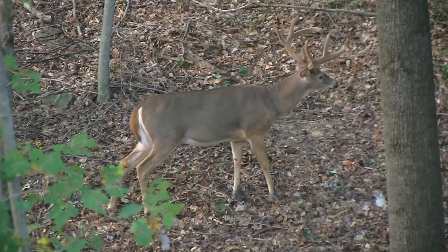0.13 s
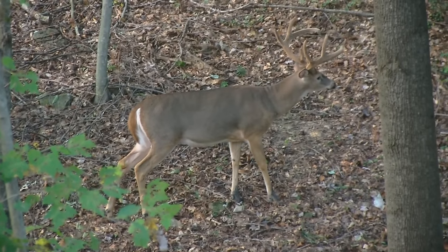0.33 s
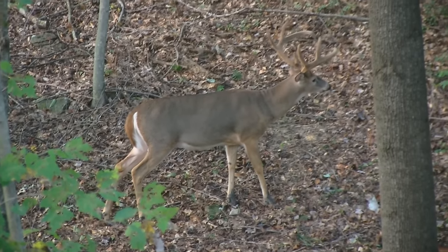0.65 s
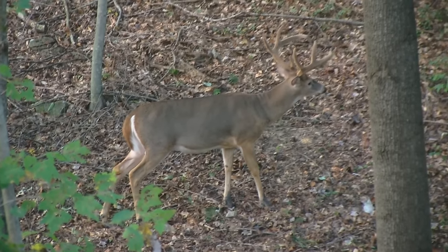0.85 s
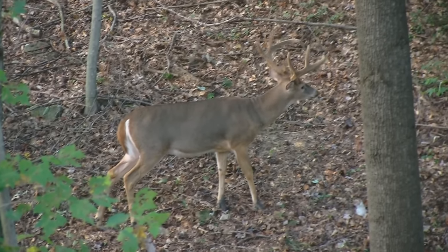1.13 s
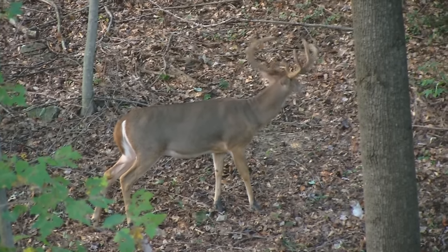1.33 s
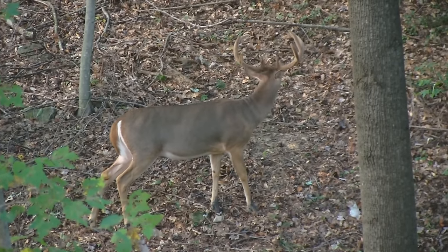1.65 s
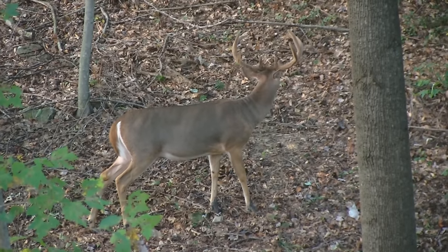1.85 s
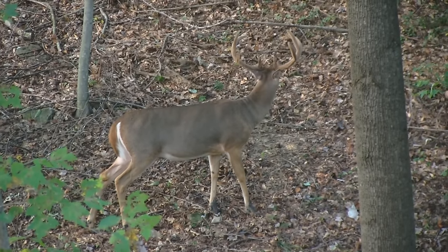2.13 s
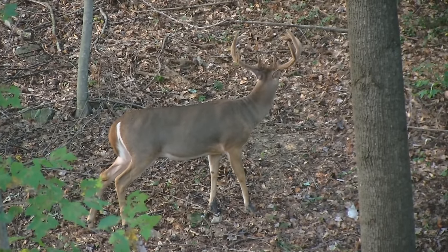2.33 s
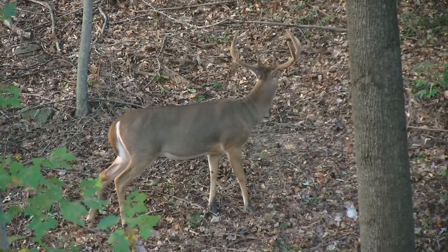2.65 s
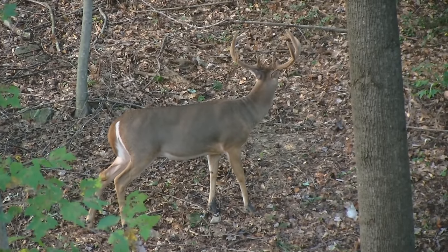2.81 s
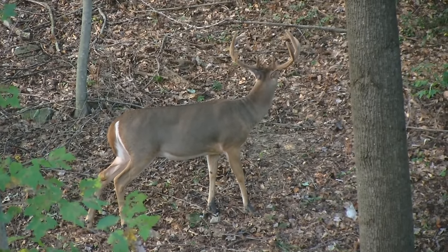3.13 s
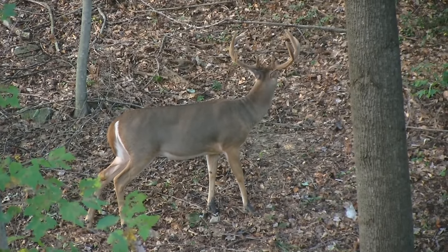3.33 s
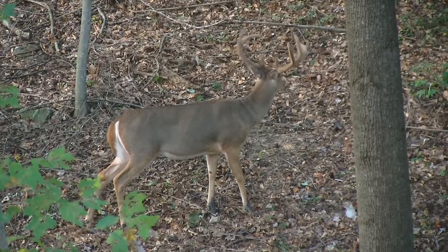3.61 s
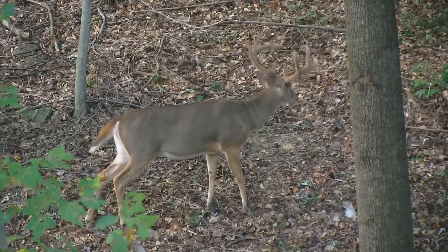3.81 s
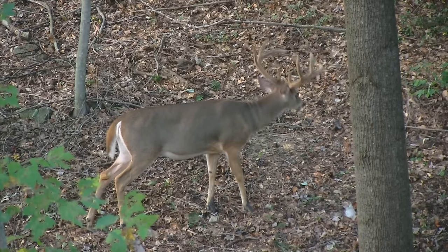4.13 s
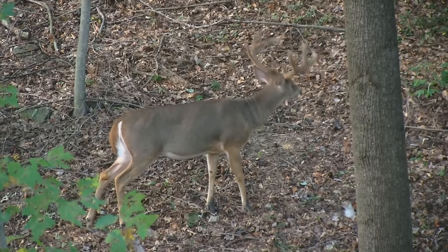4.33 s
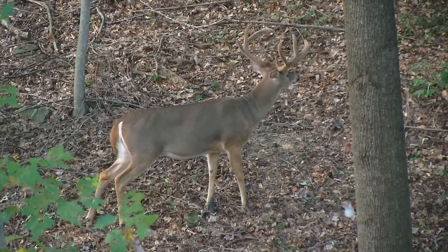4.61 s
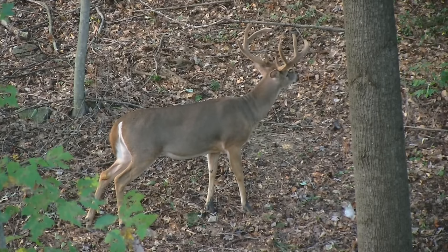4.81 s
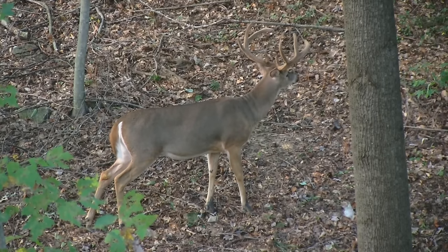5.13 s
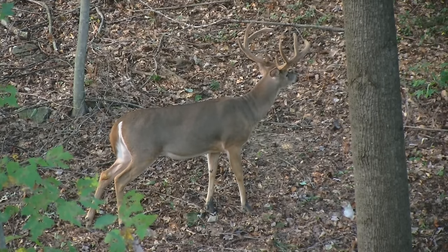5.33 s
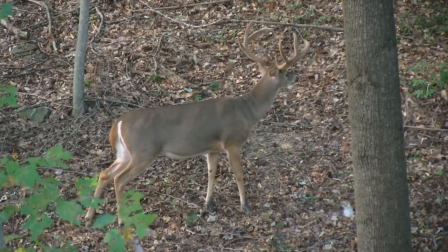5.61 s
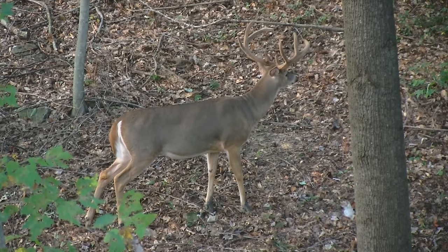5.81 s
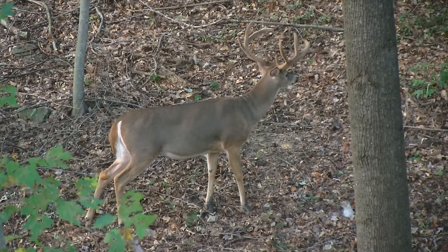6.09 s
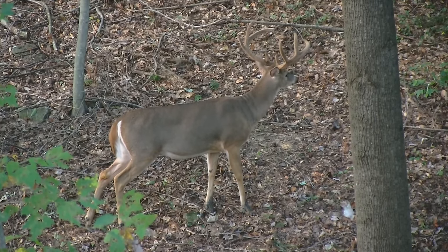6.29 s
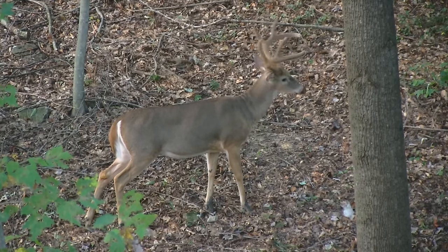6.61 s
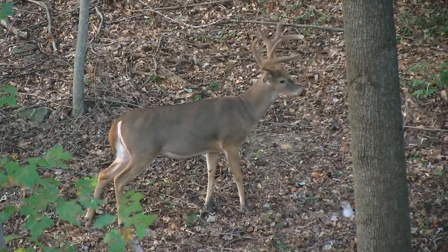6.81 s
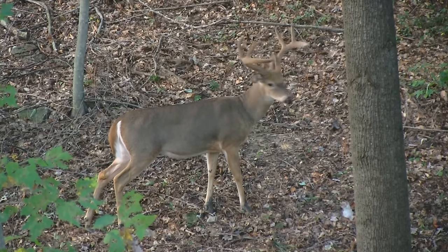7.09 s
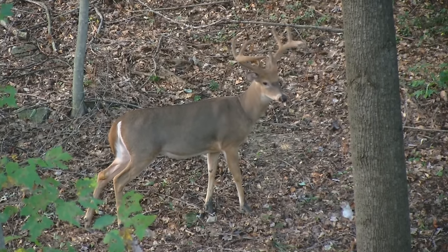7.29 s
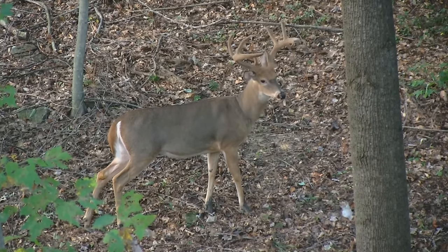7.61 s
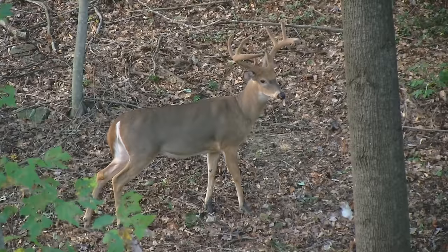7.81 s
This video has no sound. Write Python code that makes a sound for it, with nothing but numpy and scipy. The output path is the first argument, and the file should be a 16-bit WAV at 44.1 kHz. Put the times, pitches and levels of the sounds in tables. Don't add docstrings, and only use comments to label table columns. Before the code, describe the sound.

Loud rasping cicada song on the left sags and stops over distant pulsing insects, low wind rumble, and later small dry twig ticks.

```python
import sys
import numpy as np
from scipy import signal
from scipy.fft import rfft, irfft, next_fast_len
from scipy.io import wavfile
from scipy.ndimage import uniform_filter1d, map_coordinates

SR = 44100
rng = np.random.default_rng(int(sys.argv[2]) if len(sys.argv) > 2 else 0)


def voltage_ratio(level):
    return 10 ** (np.asarray(level, float) / 20)


def int16_out(signal):
    q = np.round(np.clip(np.atleast_2d(signal).T, -1, 1) * 32767)
    wavfile.write(sys.argv[1], SR, q.astype(np.int16))


N = 350595
TIME = np.arange(N) / SR

# [t/s, click rate/Hz]
TYMBAL_RATE = [(0, 334), (2.4, 355), (2.7, 215), (4.6, 235)]
# [f/Hz, level/dB per Hz]
FULL_BELLY = [(1300, -64), (2200, -29.5), (3600, -12), (3880, -4.5), (4490, -4.5), (5150, -0.5), (5600, -4),
              (5950, 1.5), (6500, 1), (7400, -7), (9000, -12.5), (9700, -16), (10500, -30.5), (14000, -42)]
# [f/Hz, level/dB per Hz]
SLACK_BELLY = [(1300, -58), (2200, -28.5), (3500, -11.5), (4100, -7), (4950, -2), (5500, -2), (6050, 0),
               (6500, -3), (7400, -10), (9000, -14), (9700, -15.5), (10500, -27), (14000, -47)]
# edge f/Hz, usual level/dB under the body
UPPER_BAND = (7670, 11.3)
# [beat number, gain/dB]
FLARES = [(3, 2.5), (7, 2), (10, 1.5), (12, 1.5), (15, 1.5), (20, 3), (22, 3.5), (23, 2), (24, 2)]
# [t/s, fall/dB, regained/dB]
DROPS = [
    (2.51, 2.6, 1.2),
    (2.76, 2.8, .9),
    (3.2, 2.2, 1.5),
    (3.45, 2.5, 2.5),
    (3.7, 5.5, 3.2),
    (4.04, 6, 4.5),
    (4.28, 7, 0),
    (4.45, 4, -2.5),
]
# [f/Hz, level/dB per Hz]
LOW_SINGERS = [(1800, -52), (3000, -18.5), (3730, -15.5), (4150, -8), (4450, -2), (4950, -0.5),
               (5200, -5.5), (5800, -12.5), (7500, -36), (12800, -120)]
# [f/Hz, level/dB per Hz]
HIGH_SINGERS = [(3200, -46), (5500, -13.5), (6000, -7.5), (6350, -6), (6700, -1), (7000, -5.5), (7450, -5),
                (8100, -10.5), (8550, -15.5), (9600, -15.5), (9900, -22), (10400, -26.5), (14000, -72)]
# [f/Hz, level/dB per Hz]
RUMBLE = [(3, -34), (8, -12), (14, -4), (20, 1.5), (28, -4), (40, -14), (50, -20.5), (62, -30), (80, -38),
          (120, -64)]
# [t/s, level/dB]
BREEZE = [(0, -45), (.5, -46), (1.2, -44), (1.65, -55), (2.3, -54), (4, -56), (5.5, -52), (6.3, -55),
          (7.4, -61), (7.95, -57)]
# [t/s, gain/dB, half length/s]
GUSTS = [(.19, 6, .08), (.64, 6, .05), (.9, 12, .045), (1.08, 11, .04), (1.49, 6, .03), (2.04, 10, .04),
         (2.63, -7, .06), (2.9, 4, .07), (4.01, -9, .04), (4.16, 5, .05), (5.2, -8, .03), (5.31, 9, .04),
         (5.76, 7, .04), (6.12, -9, .04), (6.64, 4, .05), (6.95, 9, .05), (7.24, -7, .03), (7.52, 9, .04),
         (7.87, 7, .06)]
# [f/Hz, level/dB per Hz]
WOODS = [(29, -31), (50, 14.5), (64, -6), (81, -4.5), (172, -5.5), (231, -8.5), (390, -10), (562, -13),
         (623, -13.5), (742, -12.5), (1570, -17.5), (3200, -20), (4160, -48.5), (7040, -120)]
# [t/s, gain/dB, half length/s]
STIRS = [
    (0, 3.5, .15),
    (.6, 1, .2),
    (3.7, 1, .15),
    (5.55, 2.8, .12),
]
# [f/Hz, width/Hz, level/dB]
HUM = [(91, 14, -72), (181.4, 6.9, -82), (245.8, 6.6, -77.5), (335.4, 6, -79)]
# [t/s, length/s, start f/Hz, end f/Hz, level/dB, lower octave level/dB]
PEEPS = [
    (3.214, 0.053, 1740, 1920, -66.5, -4),
    (7.204, 0.047, 1690, 2040, -63, -7),
    (7.425, .12, 2000, 1910, -69, -20),
]
# [t/s, peak level/dB, ring 0-1]
TICKS = [
    (5.895, -41, .9),
    (5.905, -58, .5),
    (6.106, -55, 0.6),
    (6.639, -64, 0.3),
]
# [f/Hz, level/dB]
CRACK = [(300, -53), (700, -15), (1100, -1), (2600, 3), (3800, 0), (4600, -20), (8000, -50)]
# [f/Hz, level/dB, t60/s]
TWIG_MODES = [(1150, -1, 0.03), (2450, 2, .02), (3100, -3, 0.012)]
# [f/Hz, level/dB per Hz]
HISS = [(20, -3), (1000, -0.5), (2000, -2), (14000, -1.5), (16000, -6.5)]

SONG_DB, TIRING_DB_PER_S = -43.7, .35
FALL_S, REGAIN_S = .012, .09
UPPER_FALL_DB, UPPER_SAG_DB_PER_S, UPPER_LAST_DB = 3, 5.5, -68
FLUTTER_HZ, FLUTTER_DB, FLUTTER_S = 9.69, .7, .005
FLARE_S, FLARE_BODY = .016, .35
LOW_DB, HIGH_DB = -62.4, -63
WASH_DB = -72.6
RING_LAG_S = .0002


def unit(x):
    return x / np.sqrt(np.mean(x ** 2) + 1e-20)


def noise():
    return rng.standard_normal(N)


def curves(rows):
    s, *columns = np.transpose(rows)
    return [np.interp(TIME, s, column) for column in columns]


def wobble(rate):
    knots = rng.standard_normal(int(N * rate / SR) + 4)
    return map_coordinates(knots, [np.arange(N) * rate / SR])


def bumps(rows):
    return sum(db * np.exp(-.5 * ((TIME - s) / width) ** 2) for s, db, width in rows)


def coloured(x, points):
    m = next_fast_len(N + 8192)
    f, db = np.transpose(points)
    bins = np.fft.rfftfreq(m, 1 / SR)
    gain = voltage_ratio(np.interp(np.log(bins + 1), np.log(f + 1), db))
    cepstrum = irfft(np.log(gain + 1e-6), m)
    cepstrum[1:m // 2] *= 2
    cepstrum[m // 2 + 1:] = 0
    return unit(irfft(rfft(x, m) * np.exp(rfft(cepstrum)), m)[:N])


def trees(x, t60, wet):
    t = np.arange(SR // 4) / SR
    tail = voltage_ratio(-60 * t / t60) * rng.standard_normal(len(t))
    tail = wet * tail / np.linalg.norm(tail)
    tail[0] = 1
    return unit(signal.fftconvolve(x, tail)[:N])


def clicks(rate, jitter, scatter_db):
    turns = np.cumsum(rate * (1 + jitter * wobble(40))) / SR
    ticks = np.diff(np.floor(turns), prepend=0)
    return unit(ticks * voltage_ratio(scatter_db * noise()) * np.sign(noise()))


def effort():
    def step(s):
        return .5 + .5 * np.tanh((TIME - s) / FALL_S)

    first = DROPS[0][0]
    fallen = step(first)
    flare_db = bumps([(FLUTTER_S + beat / FLUTTER_HZ, db, FLARE_S) for beat, db in FLARES])
    flutter = np.cos(2 * np.pi * FLUTTER_HZ * (TIME - FLUTTER_S))
    flare_db = flare_db + (1 - fallen) * FLUTTER_DB * flutter
    lost_db = 0
    for s, fall, back in DROPS:
        regained = 1 - np.exp(-np.clip(TIME - s, 0, None) / REGAIN_S)
        lost_db = lost_db + step(s) * (fall - back * regained)
    sag_db = fallen * (UPPER_FALL_DB + UPPER_SAG_DB_PER_S * (TIME - first))
    upper_db = SONG_DB - UPPER_BAND[1] + flare_db - sag_db
    body_db = SONG_DB - TIRING_DB_PER_S * np.minimum(TIME, first) + FLARE_BODY * flare_db - lost_db
    return body_db, np.maximum(upper_db, UPPER_LAST_DB)


def cicada():
    rate, = curves(TYMBAL_RATE)
    body_db, upper_db = effort()
    pump_db = .5 * np.cos(2 * np.pi * 7.78 * (TIME - 2) + .6) + .35 * wobble(16)
    drive = .46 * clicks(rate, jitter=.02, scatter_db=2.2)
    drive = drive + .36 * clicks(.8 * rate, jitter=.02, scatter_db=2.2) + noise()
    slack = np.clip((TIME - 2.45) / .15, 0, 1)
    body = (1 - slack) * coloured(drive, FULL_BELLY) + slack * coloured(drive, SLACK_BELLY)
    body = trees(body, t60=.15, wet=.38)
    edge_hz, usual_db = UPPER_BAND
    upper = signal.sosfiltfilt(signal.butter(6, edge_hz, "high", fs=SR, output="sos"), body)
    upper_gain = voltage_ratio(upper_db - body_db + usual_db + 0.75 * pump_db)
    rest = np.clip((5.5 - TIME) / 0.16, 0, 1)
    return rest * voltage_ratio(body_db + 6.5 + pump_db) * (body + (upper_gain - 1) * upper)


def chorus():
    unison = np.clip((TIME - 4.4) / 1.6, .35, 1)
    throb_db = 1.9 * unison * np.cos(2 * np.pi * 9.27 * (TIME - 6) - 1.15)
    low_drive = .45 * clicks(np.full(N, 282.), jitter=0.043, scatter_db=2) + noise()
    high_drive = 0.28 * clicks(np.full(N, 130.), jitter=0.036, scatter_db=2) + noise()
    low = trees(coloured(low_drive, LOW_SINGERS), t60=.15, wet=.3)
    high = trees(coloured(high_drive, HIGH_SINGERS), t60=.15, wet=.3)
    low = voltage_ratio(LOW_DB + 10.5 + throb_db + .25 * wobble(4)) * low
    high = voltage_ratio(HIGH_DB + 11 + 0.24 * throb_db + 0.23 * wobble(7)) * high
    return low + high


def wind():
    eddies = coloured(noise(), RUMBLE)
    power = uniform_filter1d(uniform_filter1d(eddies ** 2, size=3000), size=3000)
    size = np.sqrt(np.abs(power))
    breeze_db, = curves(BREEZE)
    return voltage_ratio(breeze_db + bumps(GUSTS) + 7.5) * eddies / (size + 0.16)


def air():
    hum = np.zeros(N)
    for hz, width, db in HUM:
        hum += voltage_ratio(db + 1.5 * wobble(3)) * np.sin(2 * np.pi * hz * TIME + .8 * wobble(width))
    wash_db = WASH_DB + bumps(STIRS) + 10.5 + 0.66 * wobble(3.4)
    return hum + voltage_ratio(wash_db) * coloured(noise(), WOODS)


def bird():
    out = np.zeros(N)
    for s, length, from_hz, to_hz, db, low_db in PEEPS:
        u = np.linspace(0, 1, round(length * SR))
        phase = 2 * np.pi * np.cumsum(from_hz + (to_hz - from_hz) * u) / SR
        whistle = np.sin(phase) + voltage_ratio(low_db) * np.sin(phase / 2)
        out[round(s * SR):][:len(u)] += voltage_ratio(db) * np.sin(np.pi * u) ** 0.99 * whistle
    return out


def twigs():
    cracks, rings = np.zeros(N + SR), np.zeros(N + SR)
    t = np.arange(SR // 10) / SR
    decay = voltage_ratio(-60 * t / 0.007) + 0.22 * voltage_ratio(-60 * t / 0.24)
    for s, db, ring in TICKS:
        puff = .55 * rng.standard_normal(len(t))
        puff[30] = 9
        cracks[round(s * SR):][:len(t)] += voltage_ratio(db) * puff * decay
        modes = sum(voltage_ratio(level - 60 * t / t60) * np.sin(2 * np.pi * hz * t) for hz, level, t60 in TWIG_MODES)
        onset = 1 - np.exp(-t / .0007)
        rings[round((s + RING_LAG_S) * SR):][:len(t)] += voltage_ratio(db) * 0.66 * ring * modes * onset
    cracks = cracks[:N]
    return rings[:N] + 1.2 * np.std(cracks) * coloured(cracks, CRACK)


def scene():
    rumble = wind()
    left = cicada() + chorus() + rumble + air() + bird() + twigs()
    return np.array([left, voltage_ratio(-44) * rumble])


def low_pass(x):
    return signal.sosfilt(signal.butter(12, 15750, fs=SR, output="sos"), x)


def record(dry):
    left_hiss = voltage_ratio(-64.5) * coloured(noise(), HISS)
    right_hiss = voltage_ratio(-67.0) * coloured(noise(), HISS)
    return low_pass(dry + np.array([left_hiss, right_hiss]))


dry = scene()
out = record(dry)
int16_out(out)
```